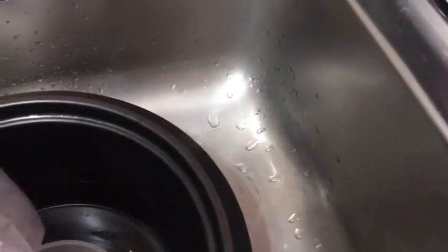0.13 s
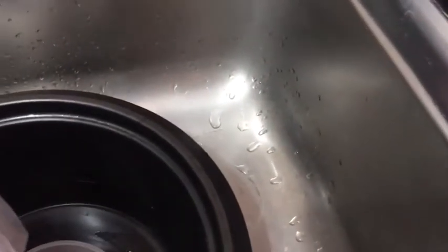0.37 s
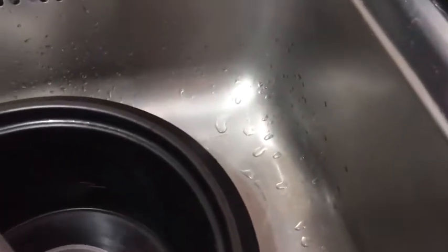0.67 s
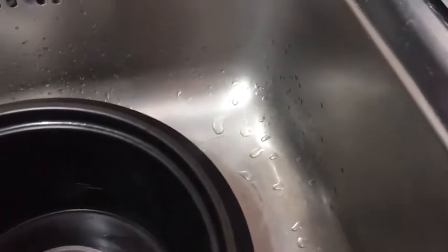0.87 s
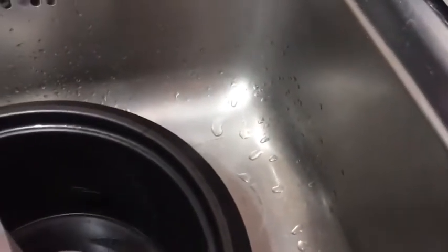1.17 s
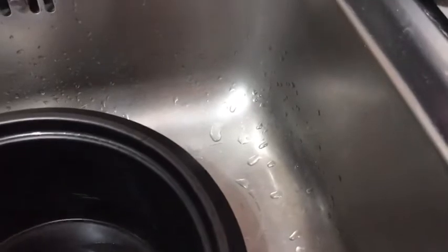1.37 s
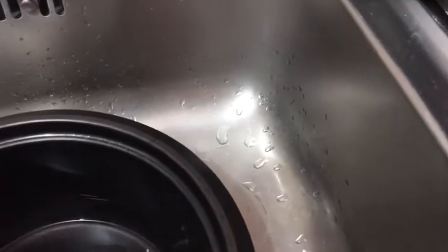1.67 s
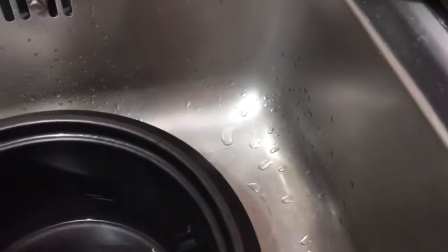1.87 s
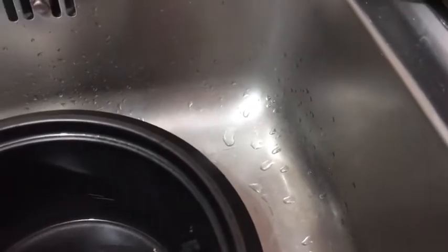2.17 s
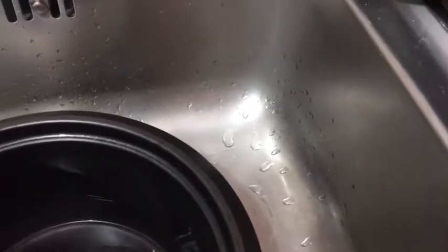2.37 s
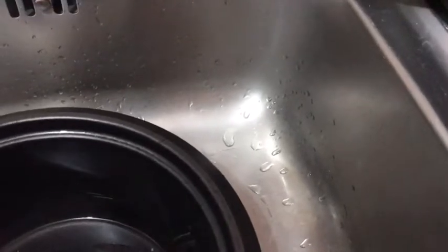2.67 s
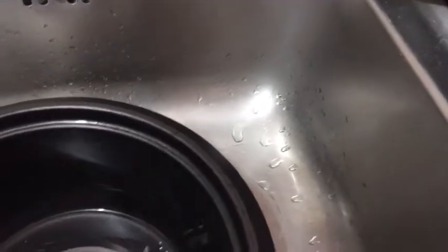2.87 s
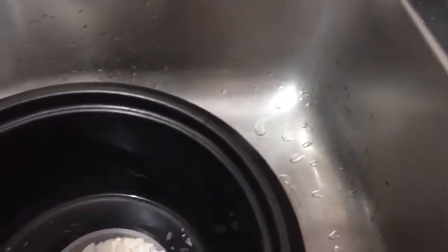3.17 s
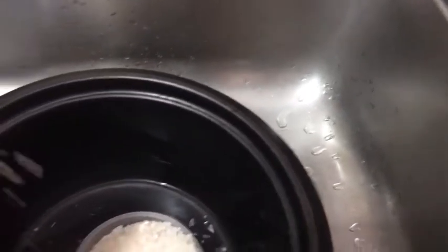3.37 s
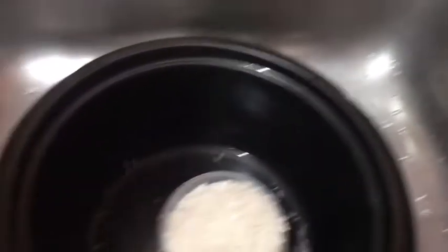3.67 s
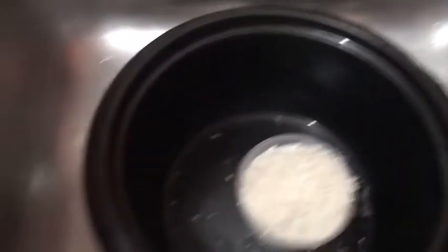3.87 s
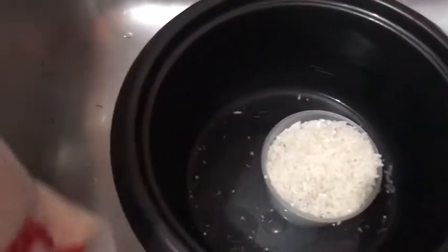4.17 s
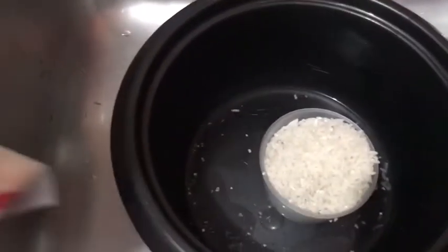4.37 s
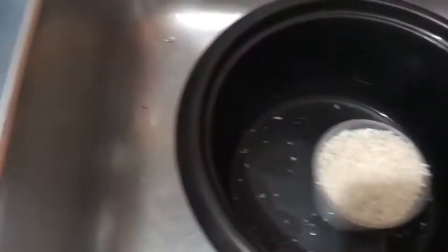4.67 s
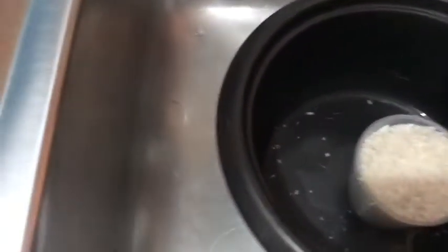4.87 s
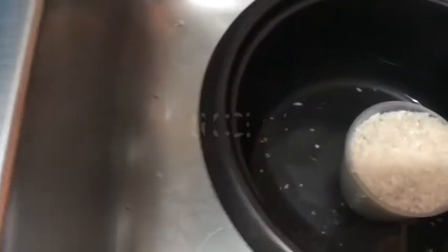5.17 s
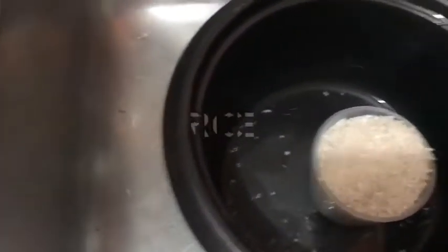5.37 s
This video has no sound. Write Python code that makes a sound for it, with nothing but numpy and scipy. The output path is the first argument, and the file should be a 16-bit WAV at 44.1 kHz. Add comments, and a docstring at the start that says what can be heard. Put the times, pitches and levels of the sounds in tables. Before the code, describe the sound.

Close up at a steel kitchen sink, a plastic bag rustles as a brief rush of dry rice runs into a pot. Fine, sharp crinkling follows while the bag is handled, giving way to lower, stiffer snaps and a few soft, hollow knocks on the basin. It ends with rice shifting quietly in the bag and a few faint ticks. An appliance hums low throughout.

```python
"""A plastic bag of dry rice is handled close by, over a pot in a steel kitchen sink.
The thin film rustles and crackles as it buckles, and the sliding rice makes the pot ring.
Thicker folds snap, most of all in the second half, and the bag bumps the sink's panels.
A quieter shuffle follows. An appliance hums at twice the mains frequency throughout."""
import sys
import numpy as np
from scipy import signal
from scipy.fft import rfft, irfft, next_fast_len
from scipy.io import wavfile
from scipy.ndimage import uniform_filter1d

SR = 44100
rng = np.random.default_rng(int(sys.argv[2]) if len(sys.argv) > 2 else 0)


def transcribe(signal):
    """Save signal, clipped to [-1, 1], as a 16-bit WAV file at the path in sys.argv[1]."""
    frames = np.atleast_2d(signal).T
    limited = np.clip(frames, -1, 1)
    pcm = np.round(limited * 32767).astype(np.int16)
    wavfile.write(sys.argv[1], SR, pcm)


N = 243873


# How loudly the hand rustles the film: time_s, level_db, extra_treble_db
HANDLING = [(0, -30, -3), (.2, -34, -2), (.45, -41, -6), (.72, -50, -2), (.95, -43.5, -11),
            (1.06, -39, -3.5), (1.45, -37.5, -4.5), (1.54, -44.5, -8), (1.7, -48, 3), (1.89, -44, -5),
            (1.95, -50, 0), (2.45, -50.5, -3), (2.72, -71, 11), (2.8, -65, -4), (3.45, -71.5, 0),
            (3.6, -52.5, 2), (3.88, -69, 5.5), (4.25, -77, 1), (4.45, -75, 4), (5.3, -62, -8),
            (5.53, -80.5, -8.5)]
# The tone of the rustle: pitch_hz, level_db
FILM_TONE = [(1470, -61), (2500, -3.5), (4780, 3.5), (8370, 0), (13000, 5), (15700, 7), (16000, -27),
             (16500, -35)]
# Flat patches of film that ring: pitch_hz, width_hz, level_db
FILM_RINGS = [(5360, 450, -13), (6640, 290, -15), (7340, 140, -5), (8300, 100, 5), (8800, 260, 1.5),
              (9580, 880, 2), (11430, 610, -7), (13100, 260, -12)]
# Moments when the film is pulled tight: time_s, level_db, pitch_hz
PULLS = [(0.048, -37, 8400), (0.993, -34, 8700), (1.166, -30, 8200), (1.278, -43, 7850), (1.8, -42, 8170)]

def film_rustle():
    """Tiny buckles make the film hiss; pulled tight, it favours one high band, a sheen."""
    level_db, treble_db = over_time(HANDLING)
    buckles = grainy(per_s=1800, spread_db=2.8, t60_s=0.009, smooth_share=0.3)
    hiss = coloured(FILM_TONE) * buckles
    # Each ring comes and goes as the film bends.
    rings = sum(amp(db + 2.2 * drift(7.7)) * resonate(hiss, hz, width) for hz, width, db in FILM_RINGS)
    film = pot_ring(hiss + rings)
    low = rms_one(butter_filter(film, 10000, "low", order=4))
    treble = rms_one(butter_filter(film, 10000, "high", order=4))
    _, sheen_hz = over_time(PULLS)
    sheen = moving_band(sheen_hz, width_hz=1700) * buckles
    slack = amp(level_db - 31)   # even slack film keeps a faint sheen
    pulls = sum(amp(db) * swell(s, rise_s=0.002, fade_s=0.093) for s, db, _ in PULLS)
    # The first rush of rice adds body below the sheen.
    body = rms_one(resonate(resonate(film, 6000, width_hz=3000), 6000, width_hz=3000))
    rush = amp(-40) * swell(0, rise_s=1, fade_s=0.25) * body
    return amp(level_db) * (low + amp(treble_db) * treble) + (slack + pulls) * sheen + rush


# The tone of sliding rice: pitch_hz, level_db
RICE_TONE = [(88, -36.5), (150, -13), (378, -14), (417, -13.5), (1230, -7.5), (2600, -8), (12800, -28),
             (15700, -32), (16000, -56.5)]
# How loudly the rice shifts in the bag: time_s, level_db
RICE_LEVELS = [(0, -42.5), (.55, -48.5), (.8, -49.5), (.9, -43), (1.3, -39.5), (1.5, -43), (1.75, -51),
               (2.3, -55.5), (2.45, -50), (2.75, -62), (3.0, -48), (3.2, -58.5), (3.33, -41.5),
               (3.39, -51.5), (3.47, -43), (3.6, -42), (3.68, -54.5), (4.0, -45), (4.22, -55),
               (4.38, -48.5), (4.44, -42), (4.73, -47), (4.8, -44), (4.95, -43), (5.15, -49.5), (5.35, -45),
               (5.53, -58.5)]

def sliding_rice():
    """Grains of different sizes shift on their own, each size in its own band of pitch."""
    rice = np.zeros(N)
    for band_hz in [(60, 1600), (1600, 3200), (3200, 16000)]:
        hiss = butter_filter(coloured(RICE_TONE), band_hz, "band")
        rice += hiss * grainy(per_s=350, spread_db=1.5, t60_s=0.023, smooth_share=0.22)
    return amp(*over_time(RICE_LEVELS)) * rms_one(pot_ring(rice))


# The notes of the pot's air and walls: pitch_hz, width_hz, level_db
POT_NOTES = [(652, 5.3, 6), (1150, 200, -2), (2300, 42, -12), (3927, 61, -0.5), (5190, 88, -1),
             (6000, 120, -9)]

def pot_ring(sound):
    """The pot rings along with the sound above it, more strongly until rice covers its floor."""
    empty_db = 10 * swell(0, rise_s=1, fade_s=1)
    ring = sum(amp(db) * resonate(sound, hz, width) for hz, width, db in POT_NOTES)
    return sound + amp(empty_db) * ring


# The tone of the sink's rumble: pitch_hz, level_db
RUMBLE_TONE = [(25, -47), (45, -12), (80, -3), (105, -1), (200, -15.5), (320, -11), (500, -14.5),
               (900, -50.5)]
# How loudly the sink shakes: time_s, level_db
RUMBLE_LEVELS = [(0, -46.5), (.55, -52.5), (.73, -41.5), (.85, -50), (1.0, -52), (1.55, -47), (2.15, -61.5),
                 (3.2, -55.5), (3.5, -43.5), (3.8, -53), (4.3, -61), (5.53, -58.5)]

def sink_rumble():
    """The sink rumbles unevenly as the hand moves the bag."""
    return amp(*over_time(RUMBLE_LEVELS)) * coloured(RUMBLE_TONE) * amp(2.0 * drift(20))


# The tone of the room's air: pitch_hz, level_db
AIR_TONE = [(30, -48.5), (90, -12), (200, 11), (450, 3), (600, 13.5), (900, 5), (1400, -39), (3000, -1),
            (6000, 2), (16000, -75)]

def hum_and_air():
    """An appliance hums at twice the mains frequency, wavering a little, over steady air."""
    hum_hz, hum_db, air_db = 120.3, -48, -63.5
    strength = np.sqrt(2) * amp(hum_db + 0.16 * drift(4.8))
    phase = 2 * np.pi * hum_hz * np.arange(N) / SR + 0.46 * drift(3.7)
    return strength * np.sin(phase) + amp(air_db) * coloured(AIR_TONE)


# Thin creases letting go; the dull part's level is counted from the bright part's:
# start_s, level_db, pitch_hz, dull_db, fade_ms
CRACKLES = [(0.044, -12.5, 8100, -20, 45), (.072, -18, 8150, -10, 50), (0.126, -23, 9350, -24, 130),
            (0.433, -19.5, 9000, -3, 23), (0.507, -19.5, 7000, -22, 53), (.522, -23, 8040, -12, 46),
            (0.6, -20, 9000, -20, 34), (.645, -24.5, 9000, -24, 15), (.702, -21, 9200, -26, 32),
            (0.766, -27, 11000, -5, 45), (0.794, -23, 8000, -12, 18), (.804, -18.5, 11500, -32, 18),
            (0.821, -22.5, 8500, -27, 20), (0.852, -25, 9000, -15, 19), (0.86, -27, 4940, 4.5, 32),
            (0.93, -24, 8400, -5, 23), (0.954, -12, 9000, -5.5, 15), (1.001, -19.5, 8900, -16, 95),
            (1.046, -15.5, 8500, -10, 32), (1.093, -32, 8350, 5, 41), (1.141, -12.5, 8900, -26, 12),
            (1.172, -16.5, 8050, -15, 72), (1.198, -19.5, 8170, -3.5, 65), (1.36, -20, 8830, -23, 71),
            (1.464, -19.5, 11900, -2.5, 47), (1.525, -14, 13040, -20, 62), (1.535, -11.5, 12200, -22, 116),
            (1.567, -11.5, 15100, -35, 62), (1.587, -16.5, 15200, -27, 96), (1.621, -8, 14800, -10, 66),
            (1.651, -13.5, 12100, -7, 41), (1.662, -16, 11400, -5, 100), (1.692, -19, 12900, -5.5, 37),
            (1.736, -21, 15100, -27, 38), (1.753, -22, 9500, -9, 68), (1.9, -22, 8400, -33, 54),
            (1.911, -9, 15300, -7, 45), (1.956, -17.5, 11500, -7, 70), (1.968, -16.5, 14400, -28, 49),
            (1.992, -23.5, 12600, -1, 56), (1.999, -17.5, 14700, -9, 55), (2.026, -14.5, 12600, -16, 62),
            (2.049, -25, 12200, -31, 61), (2.059, -12, 12500, -8, 54), (2.088, -23, 14700, -27, 31),
            (2.1, -29, 15500, -3.5, 140), (2.122, -25.5, 9700, -28, 85), (2.145, -18, 12100, -7.5, 58),
            (2.16, -18, 15600, -11, 32), (2.202, -21, 13400, -37, 17), (2.211, -13.5, 11600, -7.5, 39),
            (2.265, -29, 8950, -11, 28), (2.273, -25, 8250, -5, 55), (2.329, -20, 12200, -7.5, 69),
            (2.349, -28, 12000, -13, 54), (2.364, -19.5, 11300, -9, 91), (2.394, -23.5, 13000, -18, 39),
            (2.413, -25, 15000, -26, 45), (2.426, -18, 14000, -17, 25), (2.436, -10, 15700, -6, 32),
            (2.458, -24, 12800, -20, 28), (2.47, -32, 13000, -20, 37), (2.498, -25.5, 15500, -31, 65),
            (2.542, -24, 13000, -7.5, 32), (2.573, -23, 13800, -39, 47), (2.617, -22, 13100, -15, 64),
            (2.631, -23, 12000, -6, 31), (2.674, -28.5, 11400, -0.5, 60), (2.7, -30.5, 12600, -2, 38),
            (2.713, -36, 12600, 1, 44), (2.737, -37, 12000, -2, 30), (2.75, -37, 12000, -1.5, 31),
            (3.06, -32.5, 12800, 4, 23), (3.111, -17, 10500, -29, 21), (3.259, -31.5, 6000, 14.5, 58),
            (3.483, -16.5, 5640, -5, 20), (3.506, -22.5, 13800, 6, 65), (3.531, -11.5, 15600, -37, 31),
            (3.571, -6, 11000, -5.5, 38), (3.573, -2.5, 12600, -10, 27), (3.603, -21, 13900, -4, 47),
            (3.644, -23.5, 11500, -21, 31), (3.694, -19, 16200, -44, 85), (3.74, -23, 13600, -37, 47),
            (3.759, -23.5, 14400, -9, 35), (3.797, -21.5, 13100, -21, 26), (3.821, -25.5, 13400, -20, 27)]

def film_crackles():
    """A crease lets go with a spike and a short hiss, bright on top and duller below."""
    out = np.zeros(N)
    noises = gritty(len(CRACKLES), spread_db=5.0)
    for (start_s, level_db, hz, dull_db, fade_ms), noise in zip(CRACKLES, noises):
        spike = 0.87 * burst(noise, t60_s=0.0081, rise_s=0.000067)
        hit = spike + burst(noise, t60_s=fade_ms / 1000, rise_s=0.0026)
        focused = resonate(resonate(hit, hz, width_hz=10000), hz, width_hz=7800)
        broad = resonate(resonate(hit, 20000, width_hz=53000), 12000, width_hz=72000)
        bright = focused + 1.2 * (hz / 12500) ** 0.92 * broad   # brighter creases spread wider
        hollow = 0.68 * resonate(hit, 1080, width_hz=660)   # the space inside the bag
        dull = resonate(hit, 3000, width_hz=7300) + hollow
        add(out, start_s, amp(level_db) * (crest_one(bright) + amp(dull_db) * crest_one(dull)))
    return out


def sink_echo(sound):
    """Dense, short echoes bounce around the steel basin and come back a little dull."""
    echo_db, dull_hz = -16.5, 5500
    pole = np.exp(-2 * np.pi * dull_hz / SR)
    noise = signal.lfilter([1], [1, -pole], rng.standard_normal(SR // 4))
    tail = burst(noise, t60_s=0.1, rise_s=0.0049)
    return signal.fftconvolve(sound, amp(echo_db) * tail / np.sqrt(np.sum(tail ** 2)))[:N]


# Thick folds flipping; the tick's level is counted from the fold's, the click's from the jolt's:
# start_s, level_db, pitch_hz, tick_db, click_db
SNAPS = [(0.267, -21.5, 1040, -1, 2), (0.59, -18, 2540, -1.5, 17.5), (0.691, -22.5, 1770, -25, 23),
         (0.71, -27.5, 690, -21, 5), (1.266, -23.5, 2720, -6, 4), (2.371, -14.5, 2140, -5.5, 17),
         (2.421, -26.5, 2050, -11, 3), (2.448, -26, 2530, -14, 1), (2.666, -29, 1910, -20, -3),
         (2.689, -23.5, 1250, -11, 9), (2.808, -30, 990, -14, 2), (2.824, -25.5, 2700, -23, 10),
         (2.866, -17.5, 1060, -4, 4), (2.882, -22.5, 890, -10, 2), (2.903, -12, 2400, -11, 18),
         (2.953, -25.5, 2780, -10, 15), (2.985, -12, 2580, -13, 9), (3.012, -26, 2130, -11, 0),
         (3.031, -27.5, 1040, -23, 6), (3.054, -21.5, 2140, -7, 6), (3.083, -26, 1490, -23, 23),
         (3.112, -22.5, 1170, 0, 6), (3.127, -27, 1570, -19, 13), (3.195, -28.5, 1380, -15, 14),
         (3.238, -36, 1500, -3, 4), (3.258, -19, 2670, -9, 2), (3.266, -6.5, 2700, -26, 16),
         (3.274, -21, 1290, -14, 16), (3.292, -15, 2000, -8, 1), (3.294, -16.5, 3570, -11, -1),
         (3.303, -15, 2000, -10, 5), (3.313, -13.5, 1710, -5.5, 6), (3.399, -16.5, 2500, -6, 11),
         (3.452, -20, 626, -5, -2), (3.478, -14.5, 1400, -22, 5.5), (3.516, -13.5, 1390, -25, 11),
         (3.545, -21.5, 1570, -35, 2), (3.568, -19.5, 2100, -18, 6), (3.591, -18.5, 1280, -18, 9),
         (3.619, -19, 700, -20, 14), (3.697, -19, 1140, -27, 13), (3.747, -23.5, 660, -10, 14),
         (3.76, -21, 1830, -21, 15), (3.786, -29, 1490, -18, 17), (3.885, -20, 2180, -6.5, 8),
         (3.909, -17, 2240, -14, 12), (3.917, -28, 2000, -10, 4), (3.946, -17, 1370, 0, 1),
         (4.003, -26, 1980, -7, 5), (4.031, -27.5, 794, -27, 2), (4.047, -31, 1100, -20, 13),
         (4.078, -18, 2280, -7, 19), (4.25, -32.5, 500, -12, 10), (4.319, -21.5, 1580, -8.5, 10),
         (4.564, -27.5, 1600, -17, 12), (5.045, -29.5, 1500, -20, 13), (5.095, -31, 1900, -24, 12)]

def fold_snaps():
    """A stiff fold flips: a click and a jolt ring it, with a tick on top and a low push behind."""
    out = np.zeros(N)
    ring_ratios = rng.uniform(0.26, 1.0, (len(SNAPS), 2))   # two lower rings linger after each snap
    noises = gritty(len(SNAPS), spread_db=3.5)
    for (start_s, level_db, hz, tick_db, click_db), noise, ratios in zip(SNAPS, noises, ring_ratios):
        jolt = burst(noise, t60_s=0.024, rise_s=0.00038)
        click = amp(click_db) * burst(np.ones_like(noise), t60_s=0.0013, rise_s=0.00002)
        hit = jolt + click
        dull = butter_filter(hit, [0.38 * hz + 200, 1.25 * hz + 2200], "band")
        rings = sum(resonate(dull, ratio * hz, width_hz=100) for ratio in ratios)
        fold = 2.13 * resonate(dull, hz, width_hz=0.66 * hz) + 1.07 * rings + 0.25 * dull
        tick = resonate(resonate(hit, 4100, width_hz=1170), 6250, width_hz=15000)
        add(out, start_s, amp(level_db) * (crest_one(fold) + amp(tick_db) * crest_one(tick)))
        puff = burst(noise, t60_s=0.048, rise_s=0.00059)
        push = resonate(resonate(puff, 130, width_hz=410), 160, width_hz=460)
        push_db = -35 + 0.9 * (level_db + 21)   # louder snaps push harder
        add(out, start_s, amp(push_db) * push / np.max(np.abs(push)))
    return out


# The bag bumping the sink, and the pitch each struck spot favours: start_s, level_db, spot_hz
BUMPS = [(0.588, -40, 81), (0.654, -36, 94), (0.711, -13.5, 320), (0.715, -28.5, 98), (1.481, -39, 81),
         (1.611, -27, 315), (2.903, -21, 210), (2.989, -28, 252), (3.301, -20.5, 131), (3.452, -25, 235),
         (3.462, -26, 113), (3.517, -11.5, 202), (3.581, -22.5, 238), (3.952, -28.5, 187),
         (4.033, -30.5, 203), (4.318, -24.5, 181)]
# The notes of the sink's steel panels: pitch_hz, level_db, fade_s
PANEL_NOTES = [(79, 6, 0.36), (97.6, 6.5, 0.15), (191, 1, 0.057), (231.3, 5, 0.061), (290, -10, 0.16),
               (309.5, -11, 0.21), (662, 1, .05)]

def sink_bumps():
    """Soft blows ring the panels; notes far from the struck spot's pitch are weaker."""
    out, t = np.zeros(N), np.arange(SR // 2) / SR
    for start_s, level_db, spot_hz in BUMPS:
        for hz, note_db, fade_s in PANEL_NOTES:
            loss_db = 50 * abs(np.log2(hz / spot_hz))   # 50 dB for each octave away
            note = burst(np.sin(2 * np.pi * hz * t), t60_s=fade_s, rise_s=0.0042)
            add(out, start_s, amp(level_db + note_db - loss_db) * note)
    return out


# The tone of a brush against the film: pitch_hz, level_db
BRUSH_TONE = [(180, -28), (300, -24), (987, -18), (8440, -26), (14200, -28), (15700, -42), (16500, -47)]

def film_brush():
    """The film is brushed softly once, near the end."""
    return amp(-34.5) * swell(4.868, rise_s=0.011, fade_s=0.018) * coloured(BRUSH_TONE)


def amp(db):
    """Turn decibels into a number to multiply by."""
    return 10 ** (np.asarray(db) / 20)


def rms_one(x):
    """Scale a sound so that its average strength (rms) is 1."""
    return x / np.sqrt(np.mean(x ** 2) + 1e-20)


def crest_one(x):
    """Scale a sound by its loudest 4 ms, so that its peaks lie near 1."""
    return x / (3 * np.sqrt(uniform_filter1d(x ** 2, size=176).max()))


def add(out, start_s, sound):
    """Mix a sound in at its start time."""
    start = max(round(start_s * SR), 0)
    out[start:start + len(sound)] += sound[:N - start]


def over_time(rows):
    """Join a table's points with straight lines: one curve for each column after the time."""
    times_s, *columns = np.transpose(rows)
    return [np.interp(np.arange(N) / SR, times_s, column) for column in columns]


def swell(peak_s, rise_s, fade_s):
    """A curve that rises to 1 at peak_s and falls after it."""
    since_s = np.arange(N) / SR - peak_s
    return np.exp(-np.maximum(-since_s / rise_s, since_s / fade_s))


def burst(x, t60_s, rise_s):
    """Make a sound rise fast and die away, losing 60 dB every t60_s."""
    t = np.arange(len(x)) / SR
    return x * (1 - np.exp(-t / rise_s)) * amp(-60 * t / max(t60_s, 0.001))


def resonate(x, hz, width_hz):
    """Let a sound ring around one pitch; a narrower width rings longer."""
    r = np.exp(-np.pi * width_hz / SR)
    gain = (1 - r * r) / 2
    return signal.lfilter([gain, 0, -gain], [1, -2 * r * np.cos(2 * np.pi * hz / SR), r * r], x)


def butter_filter(x, hz, kind, order=2):
    """Keep the low part, the high part or one band of a sound."""
    return signal.sosfilt(signal.butter(order, hz, kind, fs=SR, output="sos"), x)


def coloured(tone):
    """Noise of strength 1, shaped by a tone table."""
    size = next_fast_len(N)
    hz, db = np.transpose(tone)
    bins_hz = np.arange(size // 2 + 1) * SR / size
    gain = amp(np.interp(np.log(bins_hz + 1), np.log(hz), db))
    return rms_one(irfft(rfft(rng.standard_normal(size)) * gain, size)[:N])


def drift(rate_hz):
    """A slow random wobble of strength 1."""
    r = np.exp(-2 * np.pi * rate_hz / SR)
    return rms_one(signal.lfilter([1], [1, -2 * r, r * r], rng.standard_normal(N + SR))[SR:])


def grainy(per_s, spread_db, t60_s, smooth_share):
    """The loudness of many tiny events that start at once and die away, over a steady share."""
    sizes = amp(spread_db * np.minimum(rng.exponential(1, N), 4))
    starts = rng.random(N) < per_s * amp(3 * drift(25)) / SR   # they come in clumps
    decay = amp(-120 / (t60_s * SR))
    power = signal.lfilter([1], [1, -decay], (sizes * starts) ** 2 + 1e-18)
    return np.sqrt(smooth_share + (1 - smooth_share) * power / power.mean())


def gritty(count, spread_db):
    """Short pieces of noise with an uneven grain, one row for each event."""
    shape = (count, 5000)
    return rng.standard_normal(shape) * amp(spread_db * np.minimum(rng.exponential(1, shape), 2.5))


def moving_band(hz, width_hz):
    """A narrow band of noise, of strength 1, whose centre follows hz."""
    slow = butter_filter(rng.standard_normal((2, N)), width_hz / 2, "low")
    phase = 2 * np.pi * np.cumsum(hz) / SR
    return rms_one(slow[0] * np.cos(phase) + slow[1] * np.sin(phase))


def scene():
    """Mix everything into one channel; the crackles and snaps echo in the sink."""
    hits = film_crackles() + fold_snaps()
    bag = hits + sink_echo(hits) + film_rustle() + sliding_rice()
    return (bag + sink_rumble() + sink_bumps() + film_brush() + hum_and_air())[None]


# Pitches the microphone picks up less well: pitch_hz, width_hz, depth (0 to 1)
MIC_DIPS = [(492, 133, 0.36), (5020, 170, 0.6), (10440, 1760, 0.45)]

def record(dry):
    """The microphone has a few dips; the highest treble drops in a step, then is cut off."""
    step_hz, cutoff_hz = 15850, 16979
    for hz, width_hz, depth in MIC_DIPS:
        dry = dry - depth * resonate(dry, hz, width_hz)
    stepped = signal.sosfilt(signal.ellip(6, 0.5, 22, step_hz, fs=SR, output="sos"), dry)
    return signal.sosfilt(signal.cheby2(16, 55, cutoff_hz, fs=SR, output="sos"), stepped)


dry = scene()
out = record(dry)
transcribe(out)
```